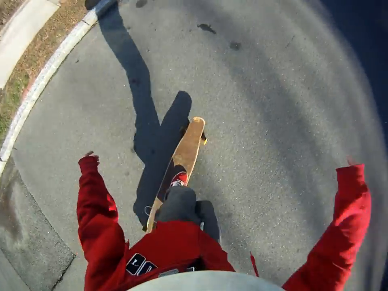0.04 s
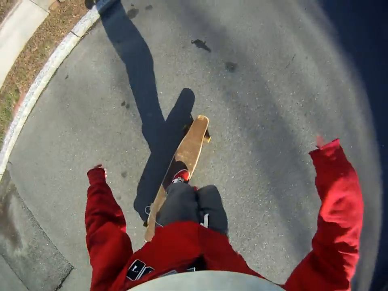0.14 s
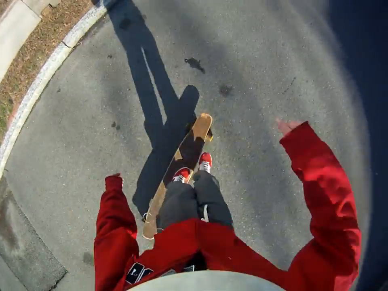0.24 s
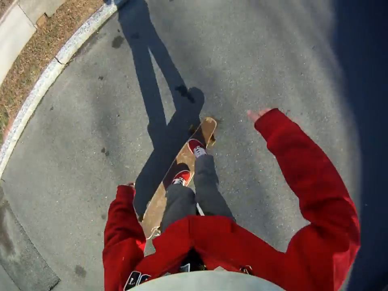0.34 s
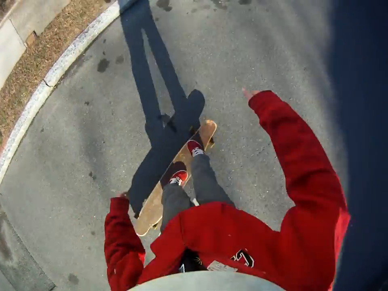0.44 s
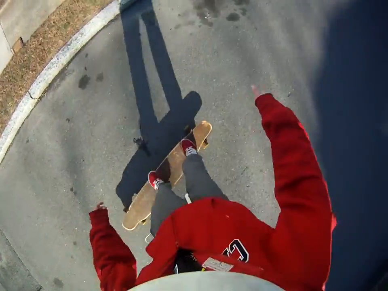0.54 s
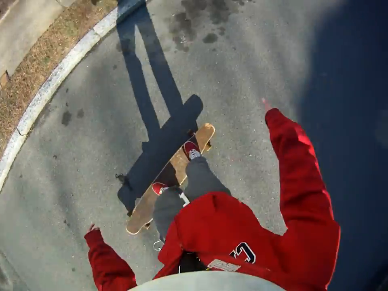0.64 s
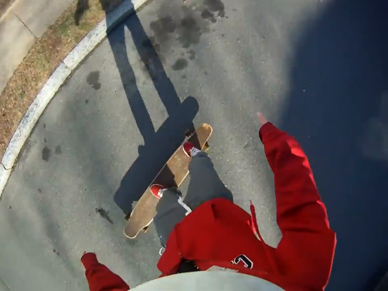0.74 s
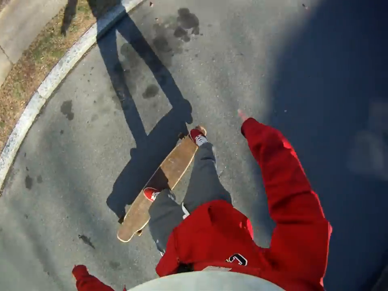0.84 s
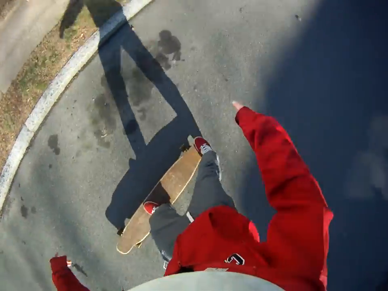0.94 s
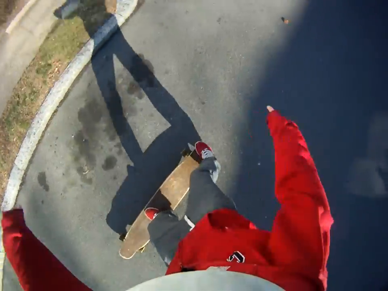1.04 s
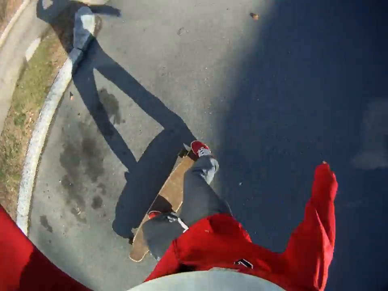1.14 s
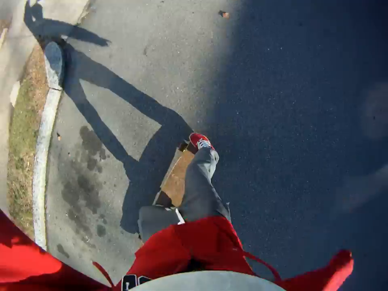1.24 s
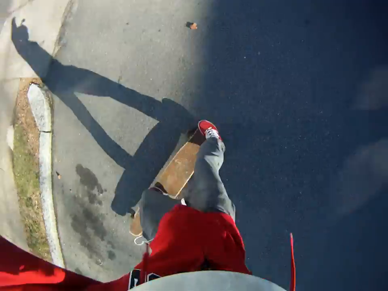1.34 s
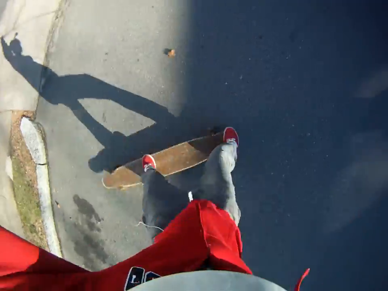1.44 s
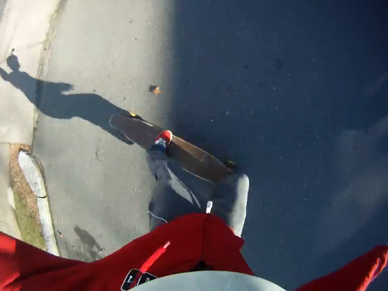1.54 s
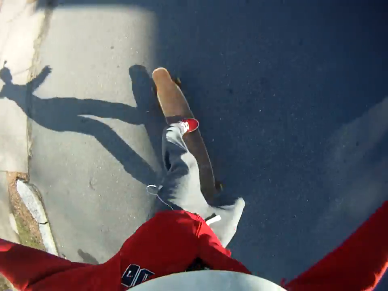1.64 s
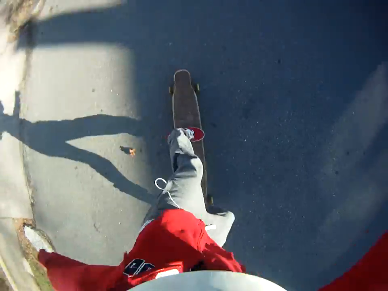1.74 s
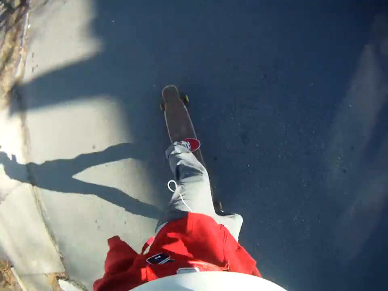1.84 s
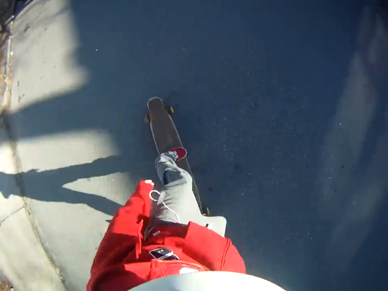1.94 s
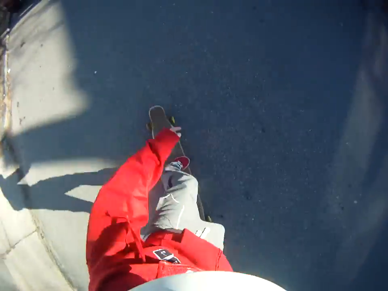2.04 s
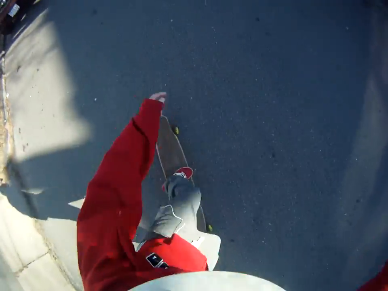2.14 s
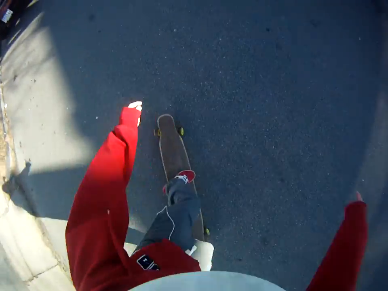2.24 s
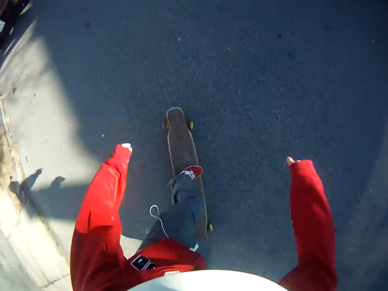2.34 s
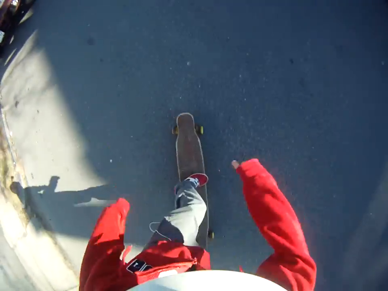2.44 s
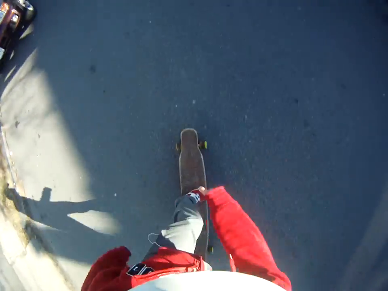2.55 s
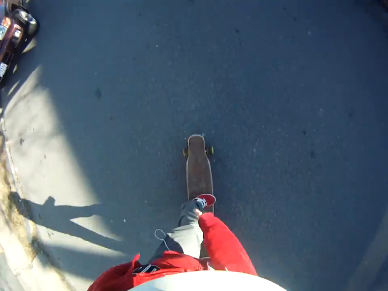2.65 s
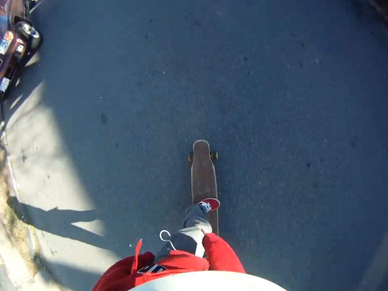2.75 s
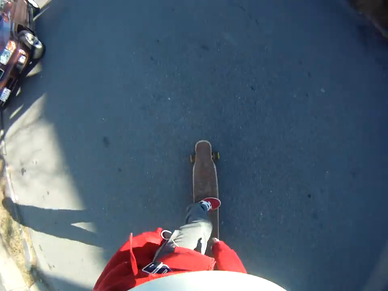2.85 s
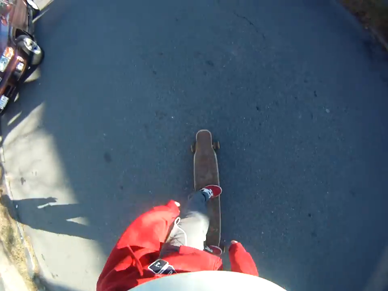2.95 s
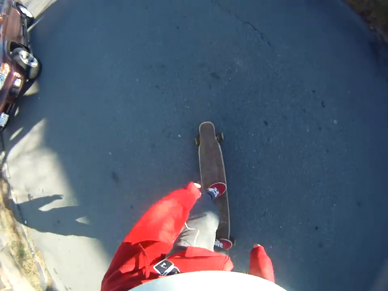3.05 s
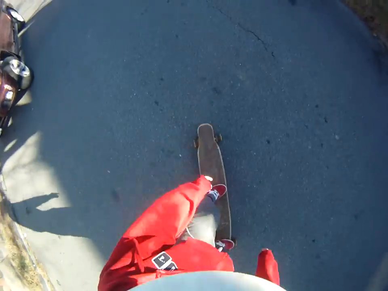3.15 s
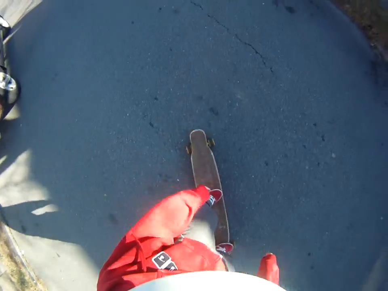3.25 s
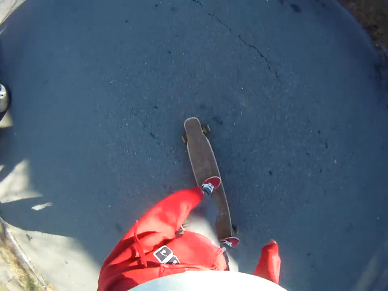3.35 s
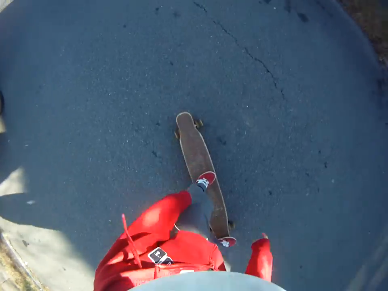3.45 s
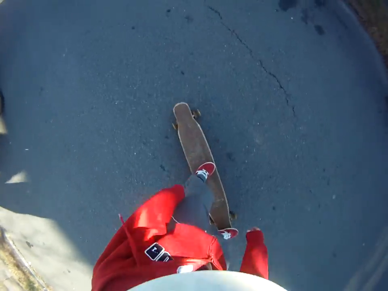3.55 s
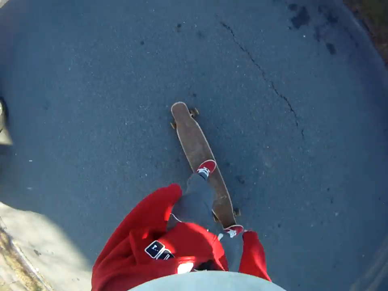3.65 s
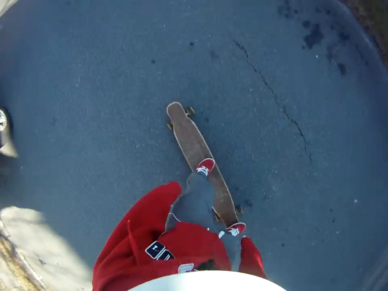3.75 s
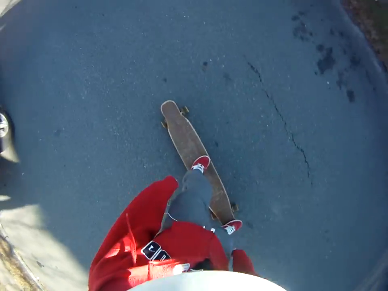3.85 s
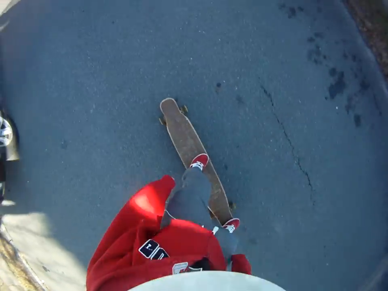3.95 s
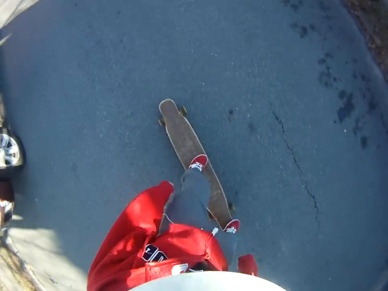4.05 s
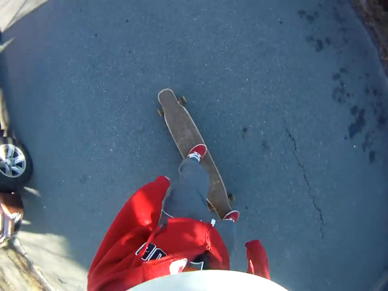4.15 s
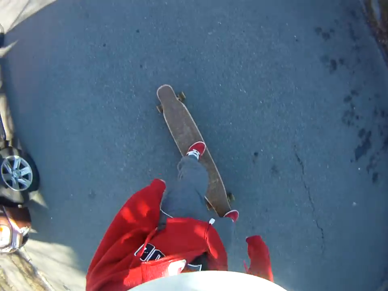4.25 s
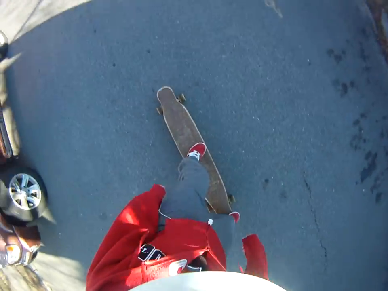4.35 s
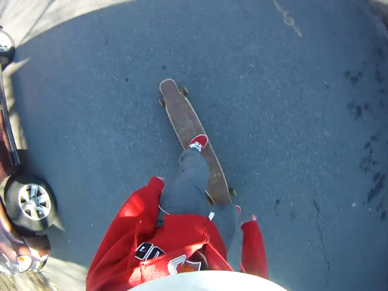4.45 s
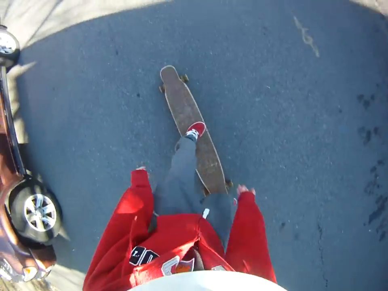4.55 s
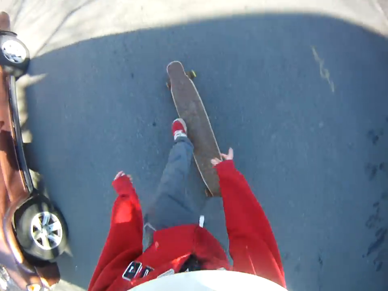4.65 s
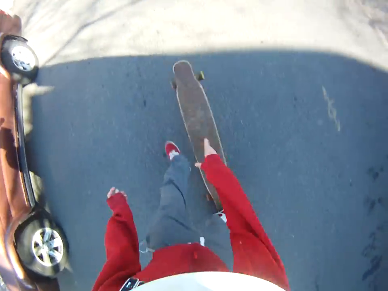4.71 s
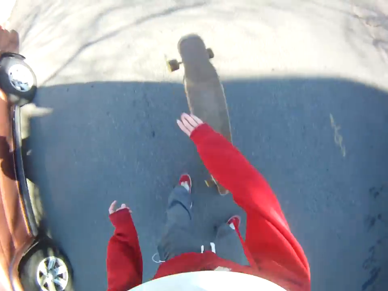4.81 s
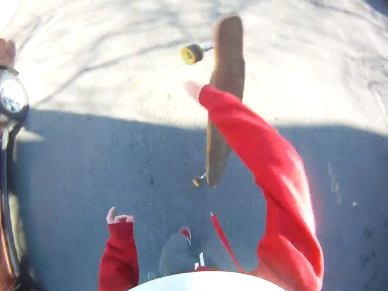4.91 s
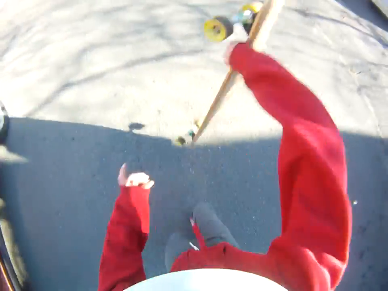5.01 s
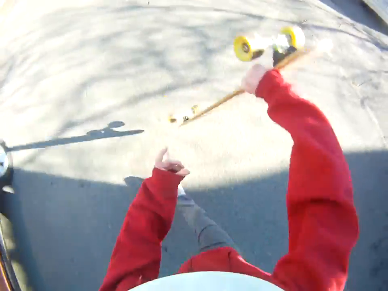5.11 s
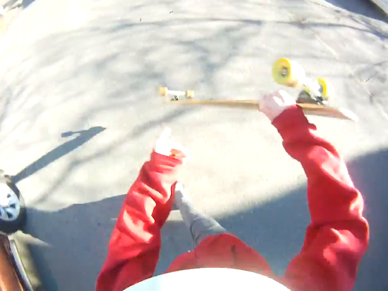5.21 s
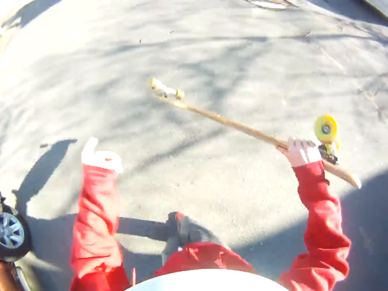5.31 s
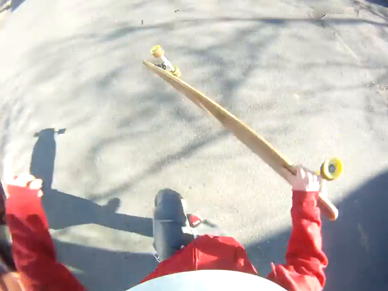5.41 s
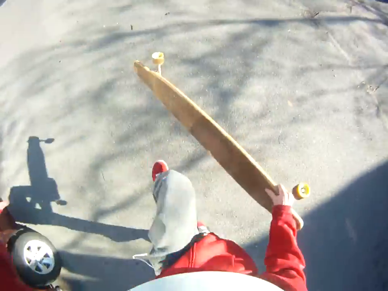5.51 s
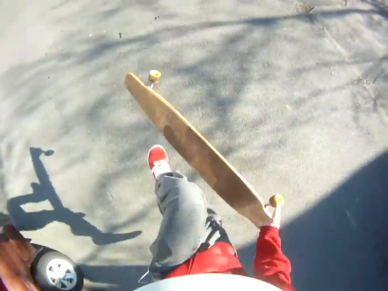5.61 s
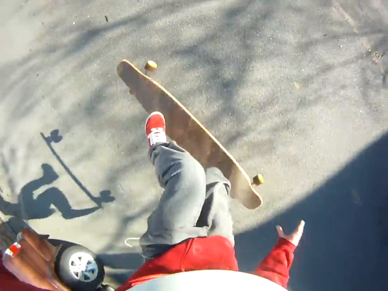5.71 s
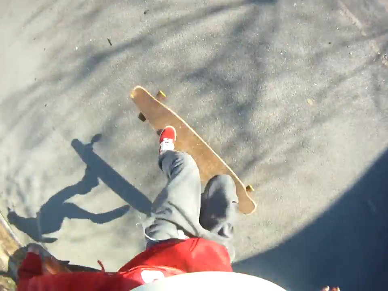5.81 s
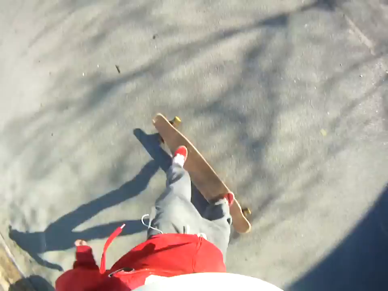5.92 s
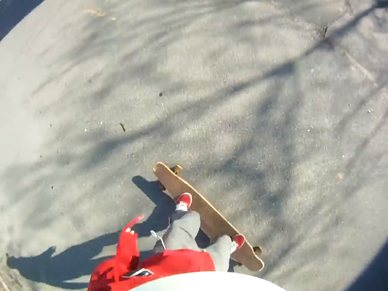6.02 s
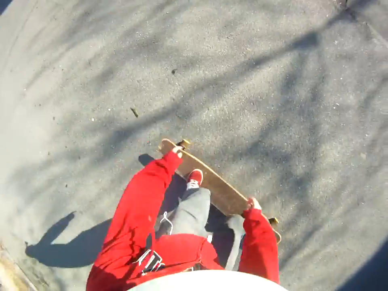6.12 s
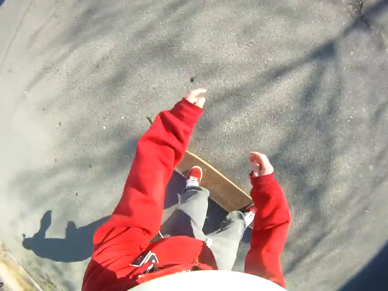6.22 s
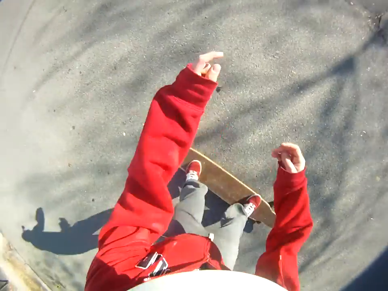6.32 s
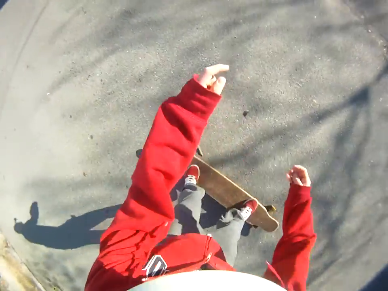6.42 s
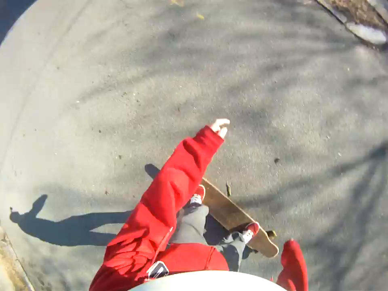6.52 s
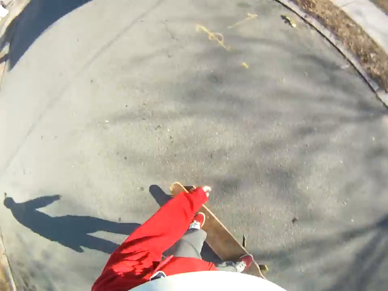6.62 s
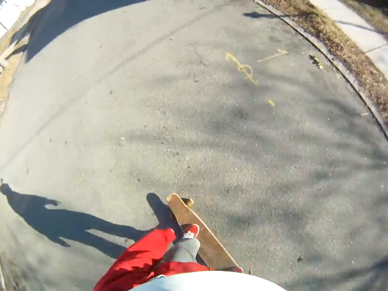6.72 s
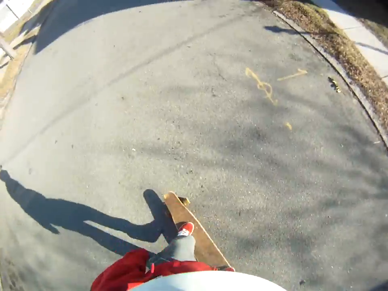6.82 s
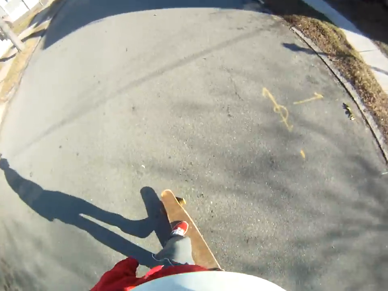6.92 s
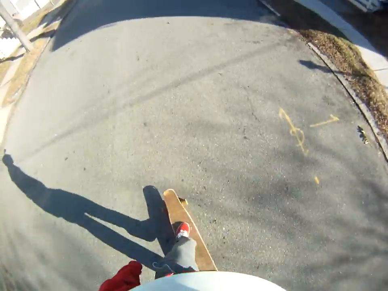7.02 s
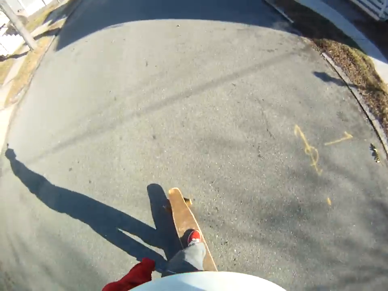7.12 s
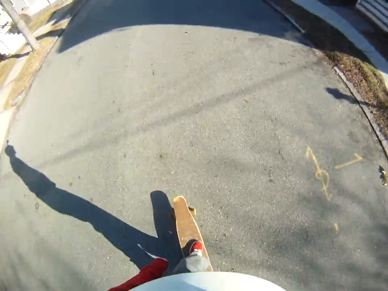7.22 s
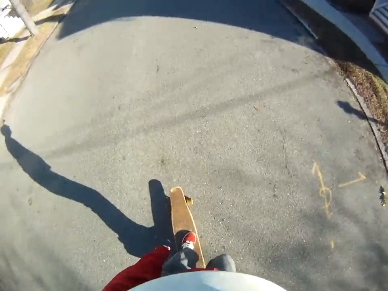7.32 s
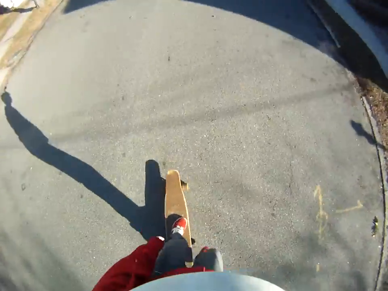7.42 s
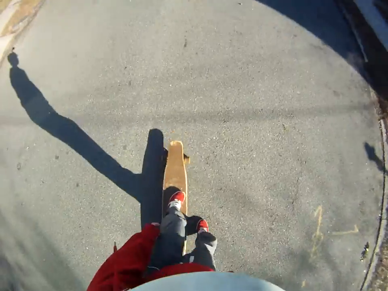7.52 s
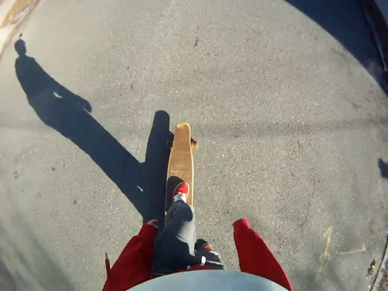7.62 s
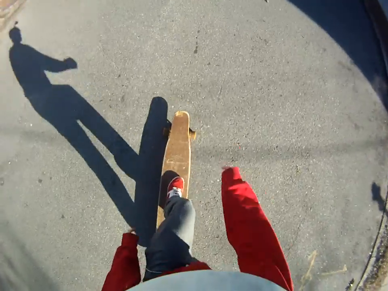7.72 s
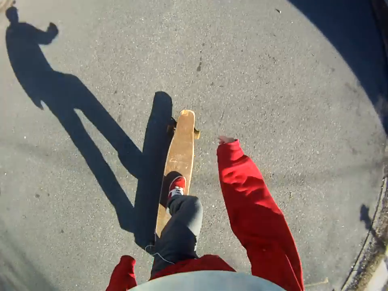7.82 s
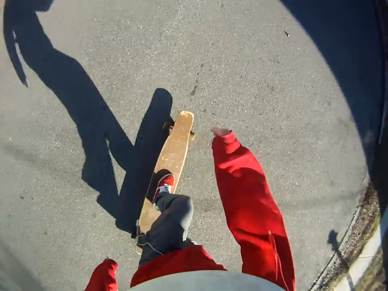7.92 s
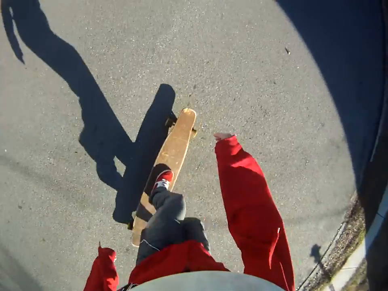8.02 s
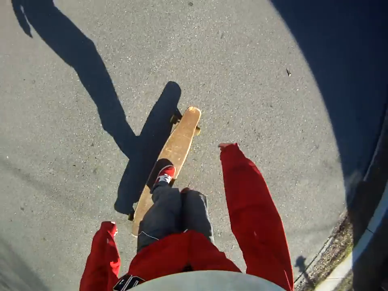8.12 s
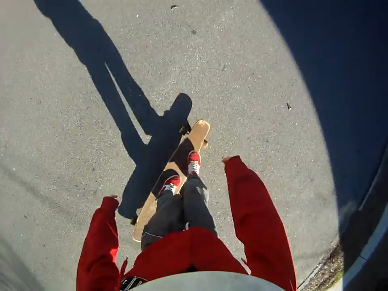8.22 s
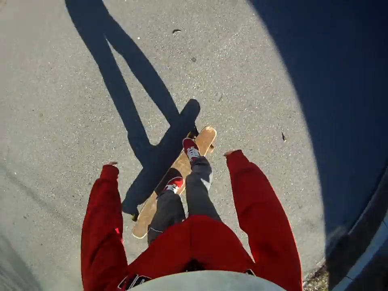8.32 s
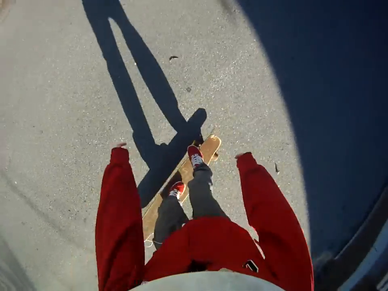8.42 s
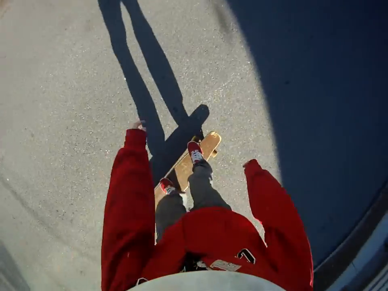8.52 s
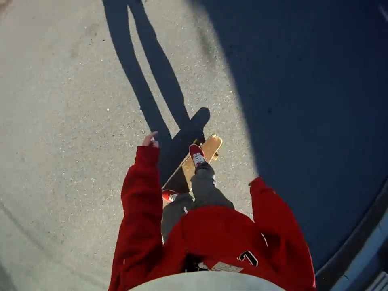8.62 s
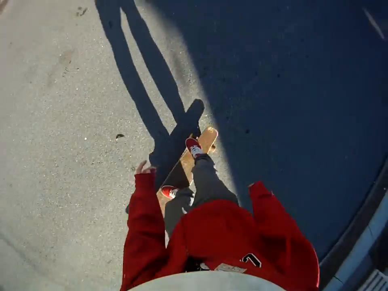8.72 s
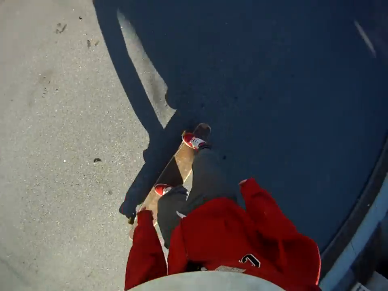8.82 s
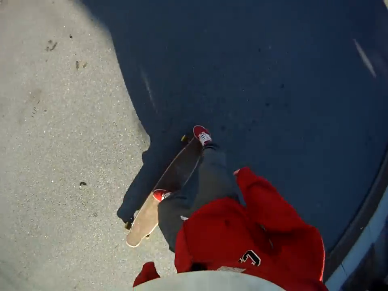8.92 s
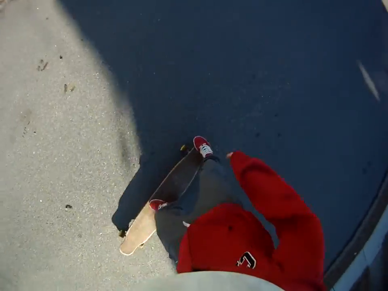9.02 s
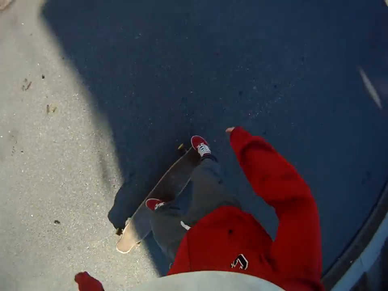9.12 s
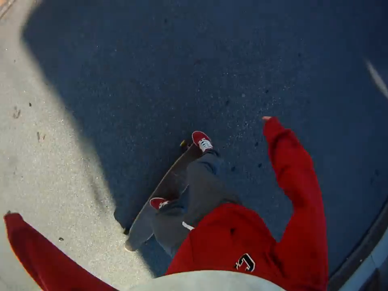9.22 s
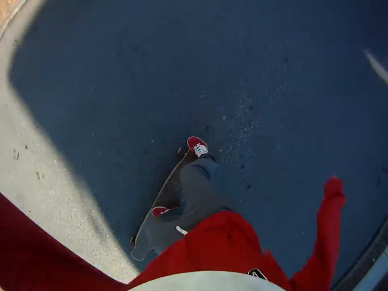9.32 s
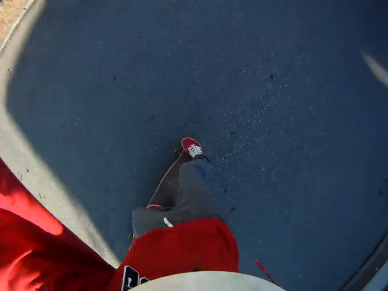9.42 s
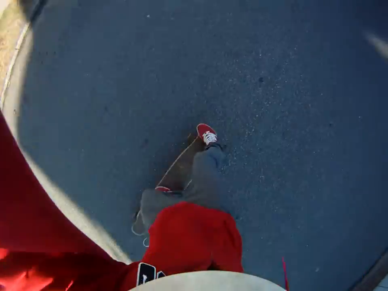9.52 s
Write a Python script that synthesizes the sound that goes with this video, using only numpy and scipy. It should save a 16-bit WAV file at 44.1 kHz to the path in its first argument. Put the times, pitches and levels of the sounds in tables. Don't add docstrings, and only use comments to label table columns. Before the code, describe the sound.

A longboard rolls on a street, heard through a closed plastic camera case: hollow low-mid rumble, wind buffeting, cloth scuffs and small plastic ticks. A hard turn around one and a half seconds brings deep thumps, knocks and grit rasps. Near five seconds a hand slaps the deck and rolling stops; footsteps and a solid landing follow, then gritty rolling resumes and eases.

```python
import sys
import numpy as np
from scipy import signal
from scipy.fft import rfft, irfft
from scipy.io import wavfile
from scipy.ndimage import uniform_filter1d

SR = 44100
rng = np.random.default_rng(int(sys.argv[2]) if len(sys.argv) > 2 else 0)


def wrap_up_sound(samples):
    columns = np.atleast_2d(samples).T
    tamed = np.clip(columns, -1, 1)
    steps = np.round(tamed * 32767).astype(np.int16)
    wavfile.write(sys.argv[1], SR, steps)


def boost(x):
    u = np.asarray(x, float) / 20
    return 10 ** u


N = 421596

# middle_s, half_length_s, deep_thump_db, buffeting_above_it_db
GUSTS = [(0.156, 0.26, -42.5, 17), (0.488, 0.13, -37.5, 4), (0.94, 0.19, -33, 0), (1.256, 0.11, -21, -10),
         (1.457, 0.028, -12, -2), (1.585, 0.063, -14.5, -21), (1.78, 0.17, -18, 0),
         (2.158, 0.088, -22.5, -23), (2.373, 0.14, -16, 1), (2.682, 0.13, -25.5, -6.5),
         (3.15, 0.24, -31, -4.5), (3.325, 0.12, -30.5, -15), (3.622, 0.31, -43.5, 11.5),
         (3.936, 0.38, -56, 26), (4.273, 0.18, -46.5, 22.5), (4.56, 0.12, -55.5, 30),
         (4.874, 0.051, -40, 17.5), (5.19, 0.032, -42, -15), (5.355, 0.055, -34, -9),
         (5.564, 0.055, -37.5, -18), (5.756, 0.077, -29, -28), (6.24, 0.12, -37.5, -12),
         (6.707, 0.1, -37.5, -18), (6.97, 0.21, -42.5, 10.5), (7.224, 0.035, -36, -6),
         (7.55, 0.26, -35.5, 1), (7.965, 0.31, -32.5, 2), (8.267, 0.26, -32, -3), (8.637, 0.068, -35, -17),
         (8.925, 0.2, -41.5, 12), (9.265, 0.11, -32, -0.5), (9.427, 0.051, -25, -11)]
# middle_s, half_length_s, level_db, fine_hiss_above_it_db
SCUFFS = [(0.0, 0.17, -46.5, -11), (0.555, 0.079, -46, -11), (0.735, 0.13, -43.5, -6.5),
          (1.402, 0.068, -43, -20), (1.61, 0.059, -40, -13.5), (1.778, 0.13, -40, -16),
          (1.97, 0.047, -50, -12), (2.31, 0.14, -50, -15), (3.193, 0.081, -47.5, -10),
          (3.446, 0.15, -49.5, -9.5), (3.837, 0.095, -49, -18), (4.645, 0.095, -48.5, -11),
          (4.968, 0.2, -41, -17), (5.262, 0.13, -49, -8.5), (5.38, 0.14, -44.5, -10.5),
          (5.66, 0.19, -47, -12.5), (5.878, 0.037, -48.5, -16), (6.152, 0.18, -41.5, -23),
          (6.455, 0.17, -50, -35), (6.823, 0.087, -50.5, -5.5), (7.003, 0.2, -53, -11),
          (7.202, 0.029, -48.5, -10), (7.716, 0.16, -47, -15), (8.632, 0.42, -52.5, -24),
          (8.886, 0.17, -51.5, -14), (9.56, 0.22, -49.5, -16)]
# pitch_hz, level_db (per Hz)
SCUFF_TONE = [(910, -4.5), (1550, -4), (1760, -3.5), (1970, -1), (3030, -4), (3560, -8), (3970, -17),
              (4100, -24), (5330, -44), (9020, -120)]
# pitch_hz, level_db (per Hz)
FINE_TONE = [(2350, -32), (4000, -4), (4330, 0.5), (4990, 1), (5540, -0.5), (5900, -8.5), (7670, -48),
             (13000, -120)]
# pitch_hz, level_db
CASE_RINGS = [(1800, -16), (2170, -14), (3060, -14)]
# middle_s, half_length_s, pitch_hz, level_db
STREAKS = [(0.794, 0.079, 3020, -45), (0.86, .06, 2280, -51), (3.3, .05, 2200, -59),
           (3.468, 0.11, 2970, -47), (3.628, 0.036, 3000, -56), (3.364, 0.074, 4900, -54.5),
           (3.57, .1, 4950, -65), (5.0, 0.066, 2350, -45), (5.2, 0.091, 2200, -52),
           (5.78, 0.015, 1400, -46.5), (5.702, .02, 1230, -48), (6.12, .06, 3070, -55),
           (6.124, 0.073, 2330, -46), (6.27, 0.13, 2260, -53), (6.147, .06, 1430, -48),
           (6.297, 0.025, 946, -44), (6.482, 0.26, 1004, -49.5), (6.517, .12, 1790, -54),
           (6.62, 0.029, 1800, -50), (6.72, 0.055, 1800, -56), (6.882, 0.2, 3070, -56),
           (8.64, 0.09, 1710, -53), (8.82, 0.094, 1830, -54), (8.912, .08, 1260, -53),
           (8.66, 0.07, 2650, -54)]
# start_s, peak_db,
# centre_hz
RASPS = [(1.524, -38, 1810), (1.5657, -28, 2350), (1.585, -33, 2230), (1.6082, -28, 1500),
         (1.6244, -20, 2110), (1.6314, -31, 2180), (1.6472, -31, 2170), (1.6766, -24, 1500),
         (1.6757, -24, 2220), (1.7399, -28, 1730), (1.772, -32, 1730), (1.7864, -36, 2260),
         (1.804, -21, 2200), (1.817, -30, 1780), (1.8294, -31, 2220), (1.8446, -28, 2200),
         (1.8751, -24, 1750), (1.8894, -36, 2010), (4.9444, -27, 2380), (4.981, -23, 2400),
         (5.0544, -28, 2070), (6.21, -18, 2320), (6.3066, -35, 3030), (6.4244, -33, 1820),
         (6.6324, -44, 1880), (6.6474, -37, 2660), (8.5544, -36, 2400), (8.5774, -28, 2260),
         (8.5919, -43, 2830), (8.6188, -40, 2800), (8.6394, -39, 1680), (8.6514, -42, 1640),
         (8.6754, -37, 1560), (8.6921, -32, 1680), (8.7024, -36, 2070), (8.7714, -37, 1970),
         (8.8474, -35, 1810), (8.8558, -36, 2500), (8.8864, -40, 1760),
         (3.186, -31, 2480), (1.64, -13.5, 1170), (2.35, -26, 2500), (2.425, -37, 3200),
                 (2.441, -38, 2600), (4.92, -9, 2000), (4.9073, -4, 2200), (4.92, -20, 2600),
                 (5.4, -20, 1400), (6.028, -12, 2100), (6.043, -16.5, 2400), (8.677, -39.5, 4600),
                 (0.4694, -27, 1700), (1.988, -33, 3000), (6.059, -30, 3300), (6.426, -37, 3200),
                 (6.448, -38, 3400), (6.142, -32, 3800), (6.306, -39, 3200), (1.1535, -19, 1750),
                 (1.846, -23, 1900), (1.8165, -21, 1700)]
# start_s, peak_db, pitch_hz
TICKS = [(0.4694, -27, 2970), (0.7731, -20, 2900), (1.0495, -28.5, 2480), (1.1537, -12, 2240),
         (1.695, -19, 2300), (1.935, -24, 2200), (2.4306, -17.5, 2250), (3.1951, -28, 2210),
         (3.4241, -28, 2800), (3.6212, -33.5, 2230), (3.7888, -34, 2150), (4.8234, -13.5, 2220),
         (4.862, -38, 2400), (5.032, -20.5, 2170), (5.1024, -23, 2210), (5.171, -23, 2170),
         (5.359, -26.5, 2240), (5.6185, -37, 2120), (5.807, -35, 2500), (6.2095, -15.5, 2340),
         (7.1824, -39, 2360), (7.6796, -26, 2240), (8.5548, -34, 2360), (8.5776, -35, 2300),
         (8.5937, -33, 2720), (8.6188, -35, 2760), (8.7044, -34, 2270), (8.965, -28.5, 2470),
         (9.125, -26, 2450)]
# start_s, peak_db, pitch_hz
CLACKS = [(1.6082, -23, 1280), (1.648, -16, 1260), (1.844, -21, 1230), (2.411, -42, 1400),
          (5.3103, -26, 1220), (5.3994, -22, 1380), (5.421, -30.5, 1400), (6.15, -27.5, 1390),
          (8.6921, -40, 1680), (8.8558, -37, 1230), (9.4928, -34.5, 1280)]
# pitch_hz, level_db
MOUNT_RINGS = [(1400, -5), (1760, -12), (2170, 2), (2410, -1.5), (2790, -8.5), (3300, -31)]
# pitch_hz, level_db, fade_by_60_db_s
TICK_OPENING = [(1760, 1, 0.01), (1990, -3.5, 0.0078), (1440, -6.5, 0.0063), (3850, -18, .012)]
# start_s, peak_db, pitch_hz
SNAPS = [(0.497, -35, 3200), (0.7014, -34, 3180), (1.3698, -36.5, 3280), (1.696, -27.5, 4200),
         (1.713, -30, 3120), (2.4643, -38, 3300), (3.5876, -42, 3380), (3.7229, -41, 3440),
         (3.7579, -48, 3420), (4.643, -42, 3360), (4.8617, -30, 3400), (5.7808, -37.5, 3420),
         (6.151, -27.5, 4000), (6.2103, -17, 3840), (6.263, -40, 3440), (6.318, -32, 3400),
         (6.3284, -30, 3450), (6.353, -35, 3120), (6.382, -39, 3560), (6.412, -36, 3440),
         (6.519, -35.5, 3520), (6.6093, -39, 3430), (6.6214, -34, 3370), (6.764, -39, 3200),
         (6.7835, -38, 3260), (8.6776, -51, 5000), (8.8357, -41, 3150)]
# start_s, level_db, pitch_hz
SLAP_CONTACTS = [(4.893, 3.5, 2710), (4.895, -7, 1320), (4.8965, -7, 1750), (4.8985, -1, 2300),
                 (4.902, -5.5, 1400), (4.9048, -8, 2200), (4.91, -8, 2160), (4.9116, -7.5, 2860),
                 (4.9146, -3, 2300), (4.919, -12, 1740), (4.926, -17, 1500), (4.93, -25, 1750)]
# pitch_hz, level_db, fade_by_60_db_s
SLAP_RINGS = [(491, -6.5, 0.15), (658, -7.5, 0.14), (875, -29, 0.066)]
# start_s, bright_db, deck_above_it_db, rattle_length_s, fade_s
RATTLES = [
    (4.893, -14.5, -6.5, 0.017, 0.0086),
    (5.654, -27, -4, 0.01, 0.0035),
    (5.925, -34, 1, 0.0043, 0.0029),
    (6.022, -18, 0, 0.018, 0.0054),
]
# pitch_hz, level_db (per Hz)
RATTLE_TONE = [(530, -55), (900, -9), (1620, -8), (1740, 1), (1890, -9), (2440, -4.5), (3590, -10),
               (4110, -18), (4550, -18), (5900, -26), (7670, -46), (13000, -120)]
# start_s, bright_db, bright_hz, deck_db, deck_hz
BLOWS = [(5.6514, -19, 1780, -15, 810), (5.655, -23, 2630, -42, 810), (5.6592, -14, 2240, -19, 646),
         (5.9218, -16.5, 2180, -14, 476), (6.024, -21, 2540, -7, 424), (6.0255, -8.5, 2840, -17, 266),
         (6.03, -24, 2320, -24, 267), (6.033, -22, 2140, 4.5, 396), (6.0355, -13, 1940, -11, 534),
         (6.0409, -19, 2300, 1.5, 447), (6.0456, -18, 3100, -3.5, 480), (6.0595, -30, 3350, -34, 600),
         (6.062, -40, 3350, -13, 450), (6.079, -40, 2250, -28, 470)]
# start_s, peak_db, pitch_hz
SEAMS = [(0.098, -32, 433), (0.289, -19.5, 585), (0.398, -29, 507), (0.849, -18, 527), (1.299, -15, 550),
         (1.349, -14.5, 550), (1.398, -10, 540), (1.461, -13, 548), (1.504, -16, 433), (1.539, -10, 549),
         (1.551, -6, 556), (1.602, -14, 527), (1.619, -14, 497), (1.679, -15.5, 387), (1.713, -13.5, 546),
         (1.734, -11, 519), (1.771, -10.5, 614), (1.787, -13, 618), (1.805, -7.5, 608), (1.871, -12, 560),
         (2.043, -19.5, 641), (2.066, -20, 428), (2.166, -17.5, 533), (2.891, -20, 516), (3.3, -32, 526),
         (3.498, -22, 460), (3.731, -17.5, 478), (3.818, -18.5, 448), (4.209, -29, 583),
         (6.242, -17.5, 524), (6.323, -26, 479), (6.363, -20, 514), (6.388, -16, 527), (6.448, -19, 429),
         (6.522, -17, 427), (6.559, -14.5, 480), (6.619, -15.5, 387), (6.898, -21.5, 525),
         (7.659, -22, 480), (7.731, -18, 426), (7.798, -14.5, 465), (8.574, -16, 449), (8.67, -20, 446),
         (8.7, -10.5, 488), (8.758, -17, 520), (8.775, -19, 466), (8.823, -19, 553), (8.895, -16, 511),
         (8.947, -23, 510), (9.403, -19, 490)]
# start_s, peak_db, pitch_hz
JOLTS = [(0.634, -9, 432), (0.72, -16, 436), (1.1545, -13, 514), (1.223, -17, 393), (1.423, -10, 580),
         (1.569, -11, 501), (1.646, 0.5, 465), (1.846, -5, 415), (1.974, -15, 440), (2.2115, -12, 535),
         (3.1105, -12.5, 550), (3.2198, -6.5, 476), (4.66, -14.5, 430), (4.69, -12.5, 560),
         (4.866, -8.5, 437), (5.4, -21.5, 633), (6.277, -14.5, 470), (7.162, -21, 520), (7.613, -14, 600),
         (8.553, -17, 556)]
# start_s, peak_db, pitch_hz
THUMPS = [(1.4625, -3, 181), (1.7995, -11, 200), (1.8225, -3, 183), (1.832, -3, 230), (1.873, -3.5, 170),
          (6.0228, -5.5, 268), (2.237, -17, 200), (2.253, -7, 166), (2.268, -10, 167), (2.417, -21, 310),
          (3.14, -14.5, 260), (5.3166, -18.5, 260)]
# time_s, wheel_load_db (as rolling level), asphalt_coarseness_db
RIDE = [(0.0, -25, 2.5), (0.24, -29, -2.5), (1.12, -30, 3.5), (1.57, -27, -2.5), (2.66, -32.5, -4),
        (3.09, -27.5, -2.5), (3.33, -33, -2), (4.85, -31, 1), (5.01, -65, 10.5), (5.56, -45.5, 7),
        (5.99, -43, 8), (6.42, -29.5, -2), (7.4, -37.5, -9.5), (7.61, -40, 1.5), (8.12, -34.5, -1.5),
        (8.81, -32, -2), (9.05, -34, 3.5), (9.56, -32.5, -1.5)]
# middle_s, half_length_s, rolling_db
PATCHES = [(0.0, 0.32, -30), (0.514, 0.049, -26.5), (0.763, 0.14, -26), (1.367, 0.31, -29),
           (1.41, 0.056, -22.5), (1.613, 0.068, -15.5), (1.814, 0.036, -15.5), (2.038, 0.054, -29),
           (2.38, 0.14, -29), (3.146, 0.13, -29), (3.652, 0.31, -32.5), (4.696, 0.11, -27.5),
           (4.916, 0.19, -33), (5.24, 0.097, -38), (5.37, 0.13, -39), (6.436, 0.27, -27),
           (6.85, 0.26, -31.5), (7.136, 0.13, -28.5), (7.674, 0.25, -26.5), (8.69, 0.12, -29),
           (9.56, 0.21, -34.5)]
# middle_s, half_length_s, growl_db
GRINDS = [
    (1.722, 0.17, -31),
    (2.07, 0.077, -41),
    (6.62, 0.63, -48.5),
    (8.69, 0.18, -42.5),
]
# pitch_hz, level_db (per Hz)
DECK_TONE = [(59, -42), (100, -26), (125, -21.5), (194, -5), (254, -5.5), (392, -0.5), (431, 2), (527, 5.5),
             (655, -6), (720, -15.5), (800, -19), (1040, -66.5), (1760, -120)]
# pitch_hz, level_db (per Hz)
WHEEL_TONE = [(600, -20.5), (740, 3.5), (880, 1.5), (1000, -13.5), (1150, -8), (1400, -27.5)]
# pitch_hz, level_db (per Hz)
BEARING_TONE = [(1050, -9.5), (1200, -12), (1290, -3), (1400, -13), (1600, -29)]

USUAL_DB = -33
SWELL_DB = 9


def noise():
    return rng.standard_normal(N)


def unit(x):
    return x / np.sqrt(np.mean(x ** 2))


def peak_one(x):
    return x / np.abs(x).max()


def colour(x, points):
    size = 4096
    hz, db = np.transpose(points)
    log_hz = np.log(np.arange(size // 2 + 1) * SR / size + 1)
    gain_db = np.interp(log_hz, np.log(hz), db, left=db[0] - 21.5, right=db[-1] - 5.5)
    ceps = irfft(gain_db * np.log(10) / 20)
    ceps = np.r_[ceps[0], 2 * ceps[1:size // 2], np.zeros(size // 2)]
    return signal.oaconvolve(x, irfft(np.exp(rfft(ceps))))[:N]


def band(x, lo_hz, hi_hz):
    sos = signal.butter(2, [lo_hz, hi_hz], "band", fs=SR, output="sos")
    return unit(signal.sosfilt(sos, x))


def walk(rate):
    hold = int(SR / rate)
    steps = noise()[np.arange(N) // hold]
    return uniform_filter1d(uniform_filter1d(steps, hold), hold)


def grit(rate, spread_db):
    hit = rng.random(N) < rate / SR
    size = np.minimum(rng.exponential(size=N), 4)
    return hit * np.sign(noise()) * boost(spread_db * size)


def swells(under_db, middle_s, half_s, db):
    t = np.arange(0, N, 64) / SR
    distance = np.abs(t - middle_s[:, None]) / half_s[:, None]
    power = boost(2 * (db[:, None] - SWELL_DB * distance ** 2.4)).sum(axis=0)
    return 10 * np.log10(boost(2 * under_db) + np.interp(np.arange(N) / SR, t, power))


def add(out, start_s, x):
    i = int(start_s * SR)
    out[i:i + len(x)] += x[:N - i]


def ring(hz, t60, phase=0., size=4000):
    t = np.arange(size) / SR
    return np.sin(2 * np.pi * hz * t + phase) * np.exp(-np.log(1000) * t / t60)


def knock(hz, t60, varied):
    body = sum(boost(db + 6.0 * v) * ring(f * (1 + 0.022 * v), 0.74 * t60, v)
               for (f, db), v in zip(MOUNT_RINGS, varied))
    x = ring(hz, t60) + 0.41 * body
    x[:40] *= np.linspace(0, 1, num=40) ** 2
    return peak_one(x)


def thud(hz, cycles):
    push = 1 - np.exp(-np.arange(4000) * hz / SR / 0.3)
    return peak_one(ring(hz, cycles / hz) * push)


def crack():
    size = 4000
    snap = 2 * uniform_filter1d(rng.standard_normal(size), size=10)
    return boost(-11.5) * snap * np.exp(-np.arange(size) / SR / 0.0027)


def bounce(x):
    return peak_one(x + boost(-4) * np.roll(x, int(0.002203 * SR)))


def mount_variations(rows):
    return rng.standard_normal((len(rows), len(MOUNT_RINGS)))


def wind(deep_db, buffet_db):
    deep = boost(deep_db - 1.5 + 0.41 * walk(22)) * band(noise(), 25.4, 118.5)
    puffs = band(grit(rate=250, spread_db=1.5), 131.0, 276.5)
    return deep + boost(buffet_db - 4.5 + 2.0 * walk(25)) * puffs


def case(db):
    return sum(boost(db + ring_db + 3.5 * walk(9)) * band(noise(), hz * .965, hz * 1.035)
               for hz, ring_db in CASE_RINGS)


def scuff(db, fine_db):
    flicker = walk(60)
    crackle = 0.52 * unit(grit(rate=400, spread_db=3.0))
    coarse = colour(boost(2.8 * flicker) * noise() + crackle, SCUFF_TONE)
    fine = colour(noise() + 0.66 * unit(grit(rate=600, spread_db=8.0)), FINE_TONE)
    return boost(db - 1.33) * unit(coarse) + boost(fine_db + 1.5 + 1.5 * flicker) * unit(fine)


def streaks():
    out, t, hiss = np.zeros(N), np.arange(N) / SR, noise()
    width = 0.049
    for middle_s, half_s, hz, db in STREAKS:
        fall_db = SWELL_DB * ((t - middle_s) / max(half_s, .02)) ** 2
        out += boost(db - fall_db) * band(hiss, hz * (1 - width), hz * (1 + width))
    return out


def creak():
    out = np.zeros(N)
    snap = sum(ring(hz, 0.0062) for hz in (4450, 4900, 5400))
    for k in range(5):
        add(out, 1.969 + k * 0.0048, boost(-30 - k * 2.5) * snap)
    return out


def rasps():
    out, t = np.zeros(N), np.arange(2000) / SR
    puff = t * np.exp(-t / 0.002)
    width = 1.26
    for start_s, db, hz in RASPS:
        x = band(rng.standard_normal(len(t)), hz / width, hz * width) * puff
        add(out, start_s, boost(db - 6) * peak_one(x))
    return out


def ticks():
    out = np.zeros(N)
    opening = sum(boost(db) * ring(hz, t60) for hz, db, t60 in TICK_OPENING)
    opening *= np.minimum(np.arange(4000) / 20, 1)
    build = 1 - 0.63 * np.exp(-np.arange(4000) / SR / 0.0017)
    for rows, t60 in ((TICKS, 0.016), (CLACKS, 0.024)):
        for (start_s, db, hz), varied in zip(rows, mount_variations(rows)):
            x = bounce(knock(hz, t60, varied)) + crack()
            if hz < 2420:
                x = x + opening
            add(out, start_s, boost(db) * x * build)
    return out


def snaps():
    out = np.zeros(N)
    rise = np.sin(np.minimum(np.arange(4000) / 50, 1) * np.pi / 2) ** 2
    for start_s, db, hz in SNAPS:
        detune, phase, top_phase = rng.standard_normal(3)
        x = ring(hz, 0.01) + 0.82 * ring(hz * (0.796 + 0.061 * detune), 0.0093, phase)
        x = x + 0.3 * ring(5540, 0.0053, top_phase)
        add(out, start_s, boost(db + 3.5) * (bounce(rise * x) + boost(-8) * crack()))
    return out


def slap():
    out = np.zeros(N)
    for (start_s, db, hz), varied in zip(SLAP_CONTACTS, mount_variations(SLAP_CONTACTS)):
        add(out, start_s, boost(db) * knock(hz, 0.0099, varied))
    swell = 1 - np.exp(-np.arange(8000) / SR / 0.014)
    deck = sum(boost(db) * ring(hz, t60, size=8000) for hz, db, t60 in SLAP_RINGS)
    add(out, 4.8955, swell * deck)
    return out


def slams():
    out, t = np.zeros(N), np.arange(8000) / SR
    bright = colour(grit(rate=1200, spread_db=2.5), RATTLE_TONE)
    deck = band(noise(), 390, 820)
    for start_s, db, deck_db, length_s, fade_s in RATTLES:
        i = int(start_s * SR)
        shape = np.exp(-np.maximum(t - length_s, 0) / fade_s - 15 * t)
        shape = shape * np.minimum(t / 0.0019, 1)
        rattle = unit(bright[i:i + len(t)]) * shape
        rumble = boost(deck_db) * deck[i:i + len(t)] * shape ** 0.32
        add(out, start_s, boost(db) * (rattle + rumble))
    for (start_s, db, hz, deck_db, deck_hz), varied in zip(BLOWS, mount_variations(BLOWS)):
        add(out, start_s, boost(db) * knock(hz, 0.011, varied) + boost(deck_db) * thud(deck_hz, 4.5))
    return out


def drums():
    out, t = np.zeros(N), np.arange(4000) / SR
    swing = t / 0.0051 * np.exp(1 - t / 0.0051)
    for start_s, db, hz in SEAMS:
        add(out, start_s, boost(db - 5.5) * np.sin(2 * np.pi * hz * t) * swing)
    return out


def jolts():
    out = np.zeros(N)
    for start_s, db, hz in THUMPS:
        add(out, start_s, -boost(db - 3.0) * thud(hz, 4.4))
    for start_s, db, hz in JOLTS:
        add(out, start_s, boost(db - 8.0) * (thud(hz, 25.0) + 0.81 * thud(615.0, 41.0)))
    return out


def rolling(db, coarse_db):
    stones = boost(1.14 * walk(35)) * (unit(grit(rate=1100, spread_db=2.0)) + 0.28 * noise())
    deck = boost(db - 0.54) * unit(colour(stones, DECK_TONE))
    growl_db = swells(db + coarse_db - 20, *np.transpose(GRINDS))
    growl = boost(growl_db) * unit(colour(stones, WHEEL_TONE))
    whirr_db = -62 + 0.75 * (db - USUAL_DB) + 1.5 * coarse_db
    whirr = boost(whirr_db) * unit(colour(stones[::-1], BEARING_TONE))
    return deck + growl + whirr


def scene():
    time_s, *columns = np.transpose(RIDE)
    load_db, coarse_db = (np.interp(np.arange(N) / SR, time_s, c) for c in columns)
    extra_db = load_db - USUAL_DB
    roll_db = swells(load_db, *np.transpose(PATCHES))

    middle_s, half_s, db, above_db = np.transpose(GUSTS)
    rumble_db = np.minimum(load_db, USUAL_DB + 0.57 * extra_db) - 4.5
    deep_db = swells(-46.5, middle_s, half_s, db)
    air = wind(deep_db, swells(rumble_db, middle_s, half_s, db + above_db))

    middle_s, half_s, db, above_db = np.transpose(SCUFFS)
    hiss_db = -54.5 + 0.76 * extra_db
    rub_db = swells(hiss_db, middle_s, half_s, db)
    rub = scuff(rub_db, swells(hiss_db - 14.5, middle_s, half_s, db + above_db))

    mono = air + case(rub_db) + rub + streaks() + creak() + rasps() + ticks() + snaps()
    mono = mono + slap() + slams() + drums() + jolts() + rolling(roll_db, coarse_db)
    return np.array([mono, mono])


def low_pass(x):
    return signal.sosfilt(signal.butter(12, 15890, fs=SR, output="sos"), x)


def record(dry):
    up, down, hold = 40, 147, 4
    x = signal.sosfilt(signal.butter(8, 5650, fs=SR, output="sos"), dry[0])
    slow = np.clip(signal.resample_poly(x, up, down), -.99, .99)
    held = signal.resample_poly(np.repeat(slow, hold), down, hold * up)[:N]
    held = np.pad(held, (0, N - len(held)))
    held = signal.sosfiltfilt(signal.ellip(6, .2, 20, 15300, fs=SR, output="sos"), held)
    return low_pass(np.array([held, held]))


dry = scene()
out = record(dry)
wrap_up_sound(out)
```